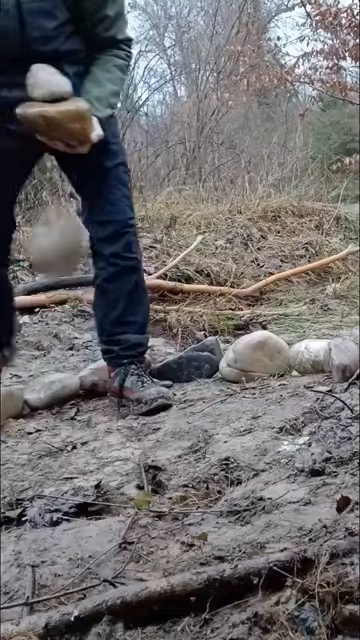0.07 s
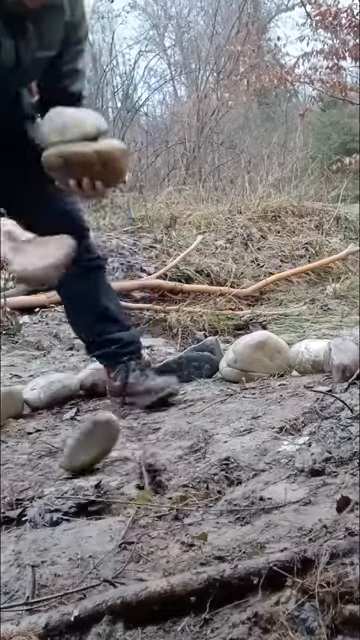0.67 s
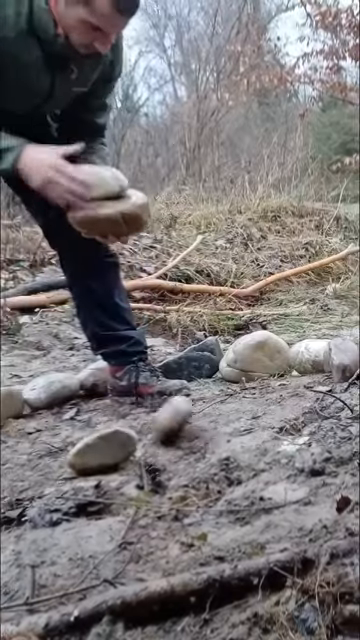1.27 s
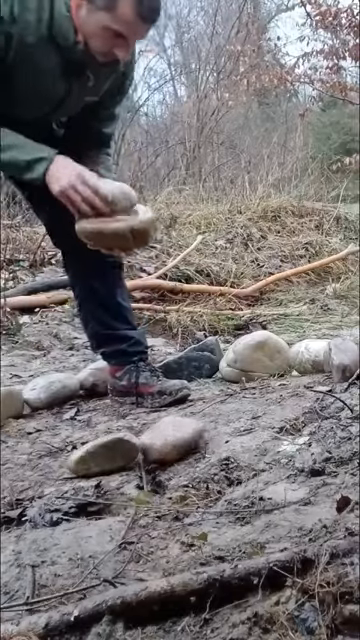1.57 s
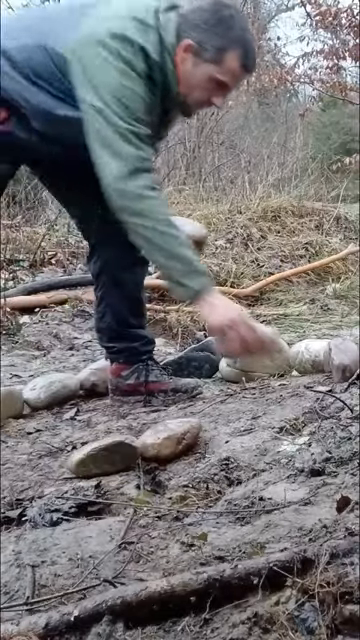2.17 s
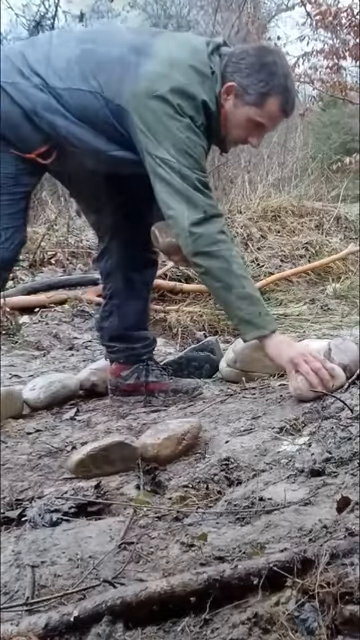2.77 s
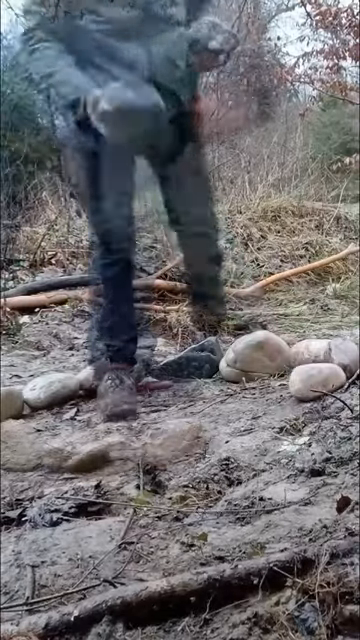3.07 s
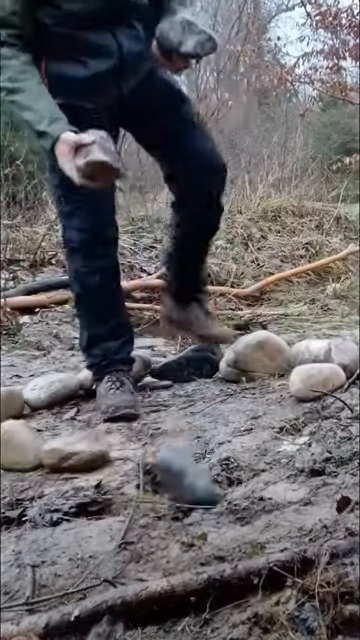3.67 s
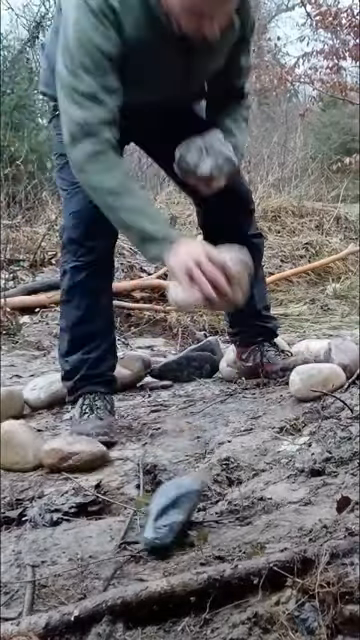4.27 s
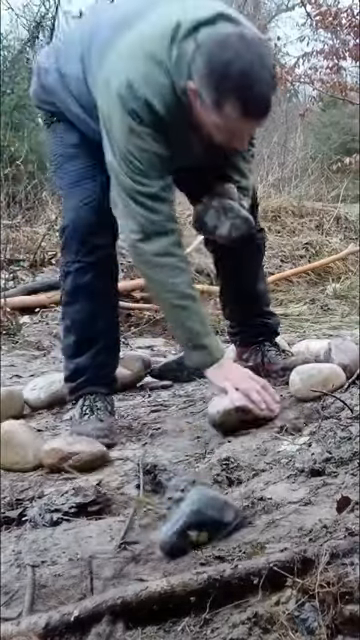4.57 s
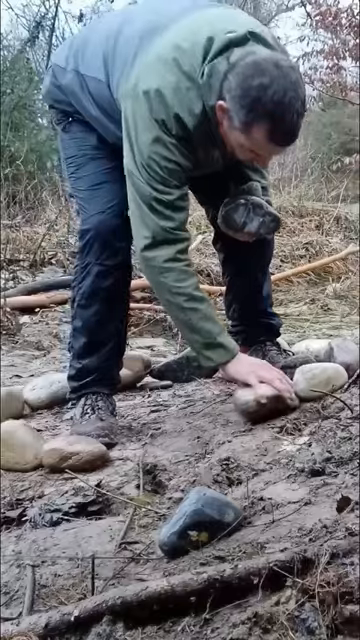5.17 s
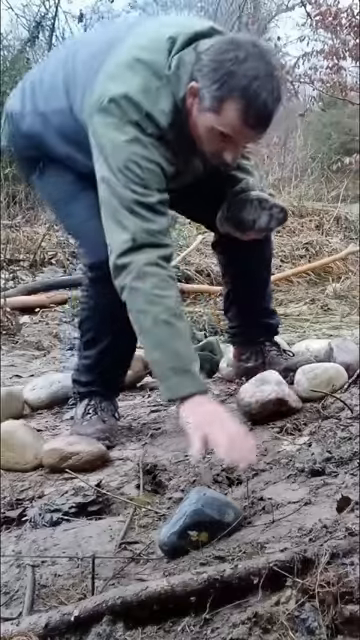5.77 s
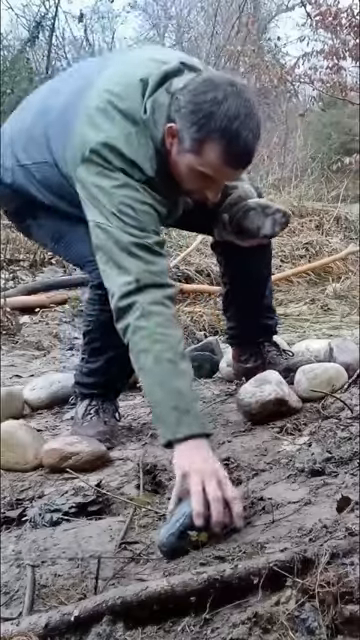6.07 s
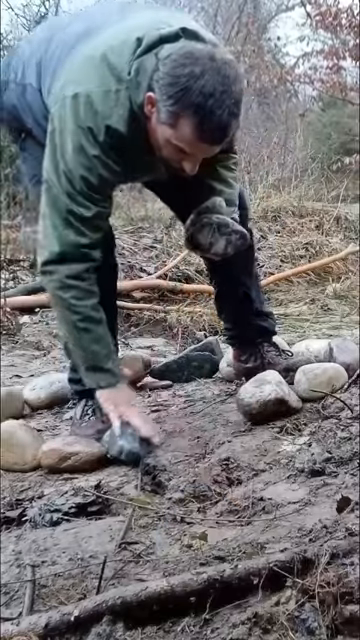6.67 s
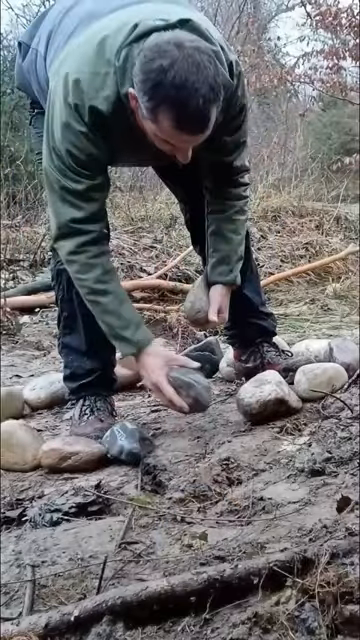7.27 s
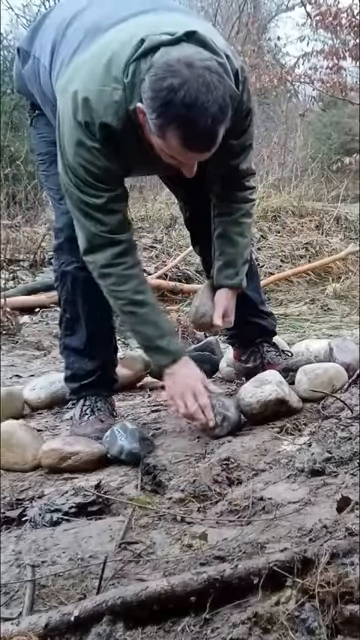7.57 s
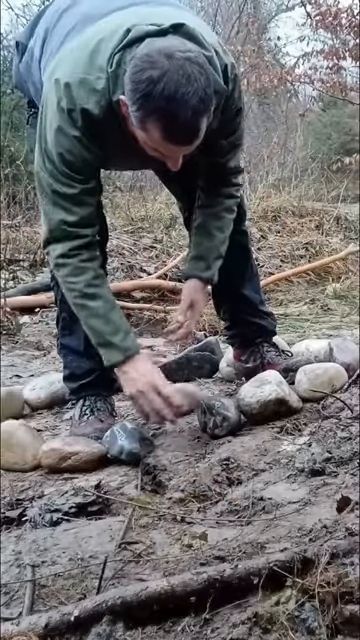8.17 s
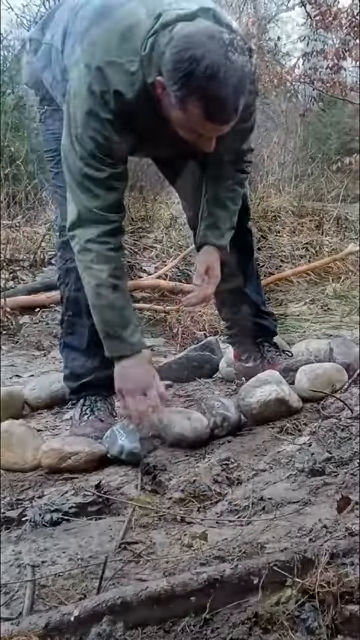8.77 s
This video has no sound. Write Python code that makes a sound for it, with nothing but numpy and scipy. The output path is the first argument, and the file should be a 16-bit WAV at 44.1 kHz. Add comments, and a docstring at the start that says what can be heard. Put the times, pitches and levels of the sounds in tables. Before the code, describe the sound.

Stones thud onto wet mud, then clack sharply against one another outdoors, with faint jacket rustles and a soft wash of drizzle.

```python
"""Rounded stones in a woodland clearing, over a faint wash of drizzle in the trees.
First four stones drop on wet mud, each with a slap and a falling thud through the soil; light
knocks come in between. From 5 s stone strikes stone in dry clacks with quick rebounds, loudest
near 6.8 s and again at 7.7 and 8.5 s. Throughout, a jacket swishes and boots press the ground."""
import sys
import numpy as np
from scipy import signal
from scipy.fft import rfft, irfft
from scipy.io import wavfile
from scipy.ndimage import uniform_filter1d

SR = 44100
rng = np.random.default_rng(int(sys.argv[2]) if len(sys.argv) > 2 else 0)


def generate_wav(signal):
    """Clip the signal to [-1, 1] and save it as 16-bit WAV at the path in sys.argv[1]."""
    frames = np.transpose(np.atleast_2d(signal))
    scaled = np.clip(frames, -1, 1) * 32767
    pcm = np.round(scaled).astype(np.int16)
    wavfile.write(sys.argv[1], SR, pcm)


N = 398223


def stones(bounce_shrink=.92, bounce_pitch=.93, dull_octaves_per_db=.03, rebound_top_hz=4400):
    """Stone on stone: single knocks, and blows with ever quicker, weaker, duller rebounds."""
    # single knocks: start_s, level_db, gap_hz, width_hz, top_hz
    knocks = [ (0.7928, -33, 780, 1200, 3200), (1.5855, -35, 1040, 550, 1700),
              (1.6240, -37.5, 1020, 500, 1870), (1.7470, -43, 1170, 800, 2030),
              (2.8580, -43.5, 600, 1500, 4500), (2.9226, -41.5, 690, 700, 1690),
              (3.011, -46, 1850, 700, 2700), (3.089, -44, 1770, 900, 2600), (3.2090, -40, 1930, 1800, 7000),
              (3.253, -45.5, 1490, 800, 2500), (5.619, -42.5, 700, 700, 1390),
              (6.8102, -7, 1440, 750, 2160), (7.1760, -38, 600, 2200, 5000), (8.4694, -7, 1260, 1160, 2900),
              (8.5041, -18, 827, 596, 1775), (8.573, -35.5, 1100, 900, 2300)]
    # bouncing blows: start_s, level_db, gap_hz, width_hz, top_hz, first_bounce_s, loss_db, rebounds
    rattles = [ (1.547, -26, 1850, 750, 2540, 0.008, 3.8, 4), (5.284, -14, 870, 1110, 2040, .0236, 10, 1),
               (6.8242, 3.5, 1470, 720, 9350, 0.013, 9.5, 3), (7.6703, -8, 1062, 805, 2090, .0194, 7, 1),
               (8.5015, -20, 1370, 1148, 3100, 0.012, 6, 2)]
    out = np.zeros(N)
    for start_s, *blow in knocks:
        add(out, start_s, clack(scatter(), *blow))
    for start_s, level_db, gap_hz, width_hz, top_hz, first_bounce_s, loss_db, rebounds in rattles:
        tail = scatter()  # one spot, same surroundings
        for k in range(round(rebounds) + 1):
            lower = bounce_pitch ** k
            add(out, start_s, clack(tail, level_db - k * loss_db, gap_hz * lower, width_hz * lower, top_hz))
            start_s += first_bounce_s * bounce_shrink ** k
            # weaker blow, longer contact, less treble
            top_hz = min(top_hz, rebound_top_hz) / 2 ** (dull_octaves_per_db * loss_db)
    return out


def clack(tail, level_db, gap_hz, width_hz, top_hz, scatter_db=-6):
    """The jolt of two stones pumps the air gap between them; contact time limits the treble."""
    # hollow ring of the air gap: pitch_ratio, width_hz, gain_db
    gap_modes = [(1, 190, -6), (1.951, 480, -4)]
    # hard surfaces nearby: delay_s, pressure_ratio
    reflections = [(.0014, 0.18), (.0024, 0.097), (.0047, .22), (.0066, 0.14)]
    t = np.arange(len(tail)) / SR
    jolt = cut(signal.unit_impulse(len(t)), top_hz, "low", order=7)
    jolt = cut(jolt, 130, "high", order=1)
    hollow = np.clip(2 - 2 * width_hz / gap_hz, .1, .9)  # flat faces trap air and ring more
    ring = sum(amp(db) * resonate(jolt, ratio * gap_hz, band_hz) for ratio, band_hz, db in gap_modes)
    pulse = resonate(jolt, gap_hz, width_hz) + (.11 + .68 * hollow) * ring
    dip_hz = .56 * gap_hz  # waves from the two stones partly cancel
    pulse -= hollow * resonate(pulse, dip_hz, .42 * dip_hz)
    pulse *= amp(level_db) / abs(pulse).max()
    echoes = sum(share * np.interp(t - delay_s, t, pulse, left=0) for delay_s, share in reflections)
    scattered = amp(scatter_db) * np.std(pulse) * unit(signal.fftconvolve(pulse, tail)[:len(t)])
    return pulse + echoes + scattered + crushed_sand(t, level_db, top_hz)


def crushed_sand(t, blow_db, top_hz, t60_s=.037):
    """Sand caught in the contact crackles; stronger, harder blows crush more."""
    level_db = -50.5 + .62 * blow_db + 10 * np.log2(top_hz / 2200)
    sand = resonate(grains(len(t), spread_db=-9), 7200, 6500)
    sand = cut(sand, 10000, "low", order=6)
    fade = amp(-60 * t / t60_s) + amp(-15.5 - 60 * t / .15)
    return amp(level_db) * unit(sand) * fade


def mud():
    """Falling stones thud and slap; boots and settling stones press the soil with a soft squelch."""
    # stones falling on mud: start_s, thud_db, end_hz, slap_db, spatter_db
    drops = [(.4310, -26, 85, -21.5, -40.5), (1.3837, -31, 76, -35.5, -49),
             (3.552, -25.5, 65.4, -32, -39.5), (4.7604, -35, 59, -40.5, -49.5)]
    # boot steps and settling stones: start_s, thud_db, end_hz
    presses = [ (.954, -55, 78), (1.729, -65, 75), (2.79, -46, 96), (3.203, -60, 81), (4.057, -51, 87),
               (4.366, -60.5, 84.5), (5.298, -56, 90), (5.623, -66, 68), (6.81, -34, 101.4),
               (7.649, -43, 84), (8.47, -45, 78), (8.533, -40.5, 90)]
    out = np.zeros(N)
    for start_s, thud_db, end_hz, slap_db, spatter_db in drops:
        add(out, start_s, thud(thud_db, start_hz=330, end_hz=end_hz, sink_s=.037))
        top_hz = 500 * (1 + amp(slap_db + 23))  # louder is brighter
        add(out, start_s, slap(slap_db, top_hz, spatter_db))
    for start_s, thud_db, end_hz in presses:
        add(out, start_s, thud(thud_db, start_hz=1.9 * end_hz, end_hz=end_hz, sink_s=.04))
        add(out, start_s, slap(slap_db=-58.5, top_hz=500, spatter_db=-61))
    return out


def thud(thud_db, start_hz, end_hz, sink_s, glide_s=.0095, rumble_t60_s=.36):
    """Soil yields unevenly under the weight: a few falling cycles, then a lumpy settling rumble."""
    t = np.arange(SR // 2) / SR
    lumps = noise([(20, 0), (150, 0), (300, -25), (1000, -80)], len(t))
    pitch_hz = (end_hz + (start_hz - end_hz) * np.exp(-t / glide_s)) * (1 + .2 * lumps)
    bump = .89 * np.exp(-t / .0086)
    sinking = 2.02 * (t / sink_s) * np.exp(-(t / (.72 * sink_s)) ** 2.6)
    push = np.sin(2 * np.pi * np.cumsum(pitch_hz) / SR) * (bump + sinking)
    jolts = amp(2.5 * noise([(5, 0), (30, 0), (70, -30), (300, -90)], len(t)))
    # ringing of the soil: frequency_hz, density_db
    soil = [(20, -55), (45, -8.5), (70, 4), (120, -4.5), (170, -10), (270, -10), (380, -19.5), (700, -38.5),
            (2000, -58.5)]
    settling = (1 - np.exp(-(t / .039) ** 2)) * amp(-60 * t / rumble_t60_s)
    rumble = noise(soil, len(t)) * unit(jolts) * settling
    rumble_db = -18 + .63 * thud_db
    return amp(thud_db) * push + amp(rumble_db) * rumble


def slap(slap_db, top_hz, spatter_db, slap_t60_s=.052, spatter_t60_s=.041, plop_hz=450):
    """Air squeezed from under the weight plops, and wet soil spatters."""
    t = np.arange(SR // 4) / SR
    blow = signal.unit_impulse(len(t)) + .062 * rng.standard_normal(len(t)) * amp(-60 * t / slap_t60_s)
    puff = cut(blow, top_hz, "low", order=2)
    puff = cut(puff, 260, "high", order=2)
    puff += amp(1) * resonate(puff, plop_hz, 220)
    spatter = cut(grains(len(t), spread_db=3.5), 910, "high", order=1)
    spatter = cut(spatter, 10000, "low", order=3)
    spatter = unit(spatter + 2.3 * cut(spatter, 2994, "low", order=1))
    fade = amp(-60 * t / spatter_t60_s) + amp(-17.5 - 60 * t / .27)
    return amp(slap_db) * puff / abs(puff).max() + amp(spatter_db) * spatter * fade


def handling():
    """Cloth swishes, grit snaps and a stone scrapes in the hands."""
    # cloth brushing or a stone sliding: peak_s, rise_s, level_db, centre_hz
    strokes = [ (1.71, 0.022, -65, 7000), (2.33, .13, -65, 2400), (2.785, .035, -62.5, 6000),
               (3.18, 0.038, -73, 12500), (3.84, 0.077, -63, 6900), (4.035, 0.053, -58.5, 11000),
               (4.23, 0.067, -60, 8100), (4.38, .14, -64, 1800), (4.788, 0.02, -51, 7350),
               (5.326, 0.033, -62.5, 9400), (6.17, .07, -65.5, 10200), (6.368, .036, -53, 8550),
               (6.42, 0.029, -52, 9000), (6.465, 0.014, -50.5, 8500), (7.23, .09, -67.5, 7500),
               (7.695, 0.022, -66.5, 9500), (8.135, 0.031, -58.5, 10380), (8.5, 0.037, -56, 8480)]
    # grit snapping: peak_s, level_db, centre_hz
    ticks = [(.793, -58, 7500), (.902, -60, 2800), (2.334, -59, 3480), (2.566, -61, 7000),
             (3.195, -56.5, 12000), (3.829, -47.5, 8000), (4.0568, -40, 12500), (5.765, -59, 7860)]
    # stone passed between hands: peak_s, fall_s, level_db
    handover = (7, .11, -60)
    out = np.zeros(N)
    for peak_s, rise_s, level_db, centre_hz in strokes:
        add(out, *swish(peak_s, level_db, centre_hz, rise_s, fall_s=1.2 * rise_s))
    for peak_s, level_db, centre_hz in ticks:
        add(out, *swish(peak_s, level_db, centre_hz, rise_s=.0009, fall_s=.0058))
    add(out, *scrape(*handover))
    return out


def swish(peak_s, level_db, centre_hz, rise_s, fall_s, catch_db=1.9, snap_db=-9, body_db=-2):
    """Fibres or grit catch and slip between sliding surfaces. Returns start_s, sound."""
    t = np.arange(-2.5 * rise_s, 4 * fall_s, 1 / SR)
    stroke = np.where(t < 0, np.exp(-(t / rise_s) ** 2), np.exp(-abs(t / fall_s) ** 1.2))
    catches = amp(catch_db * unit(uniform_filter1d(rng.standard_normal(len(t)), size=200)))
    snaps_per_s = centre_hz / 20  # coarser surface: lower sound, fewer snaps
    snaps = unit(rng.standard_normal(len(t)) * (rng.random(len(t)) < snaps_per_s / SR))
    rub = resonate(grains(len(t), spread_db=0) + amp(snap_db) * snaps, centre_hz, .45 * centre_hz)
    body = resonate(rng.standard_normal(len(t)), 2200, 2150)
    return peak_s + t[0], amp(level_db) * stroke * unit((rub + amp(body_db) * body) * catches)


def scrape(peak_s, fall_s, level_db, rise_s=.025):
    """Grit rubbed over a stone excites narrow resonances. Returns start_s, sound."""
    # resonances of the rubbed stone: pitch_hz, width_hz, gain_db
    modes = [(820, 150, 3), (1624, 130, -3), (2560, 80, 0.5)]
    t = np.arange(-2.5 * rise_s, 4 * fall_s, 1 / SR)
    rub = grains(len(t), spread_db=2)
    ring = sum(amp(db) * unit(resonate(rub, hz, width_hz)) for hz, width_hz, db in modes)
    stroke = np.where(t < 0, np.exp(-(t / rise_s) ** 2), np.exp(-t / fall_s))
    return peak_s + t[0], amp(level_db) * unit(ring) * stroke


def scatter(near_t60_s=.044, far_t60_s=.14, far_db=-18):
    """Rough ground, legs and other stones scatter a pulse into a short tail."""
    t = np.arange(SR // 5) / SR
    fade = amp(-60 * t / near_t60_s) + amp(far_db - 60 * t / far_t60_s)
    return fade * (1 - np.exp(-t / .0018)) * rng.standard_normal(len(t))


def woods(x, near_db=-38, near_t60_s=.53, far_db=-45, far_t60_s=.78, edge_s=.16):
    """Nearby brush gives a faint tail; trunks at the clearing's edge answer later."""
    # dull echo off the trees: frequency_hz, density_db
    trees = [(100, -4), (500, -9), (800, 0), (1200, -7.5), (2600, 2.5), (3500, -10.5), (12000, -25)]
    t = np.arange(SR) / SR
    brush = noise(trees, len(t)) * amp(-60 * t / near_t60_s)
    trunks = noise(trees, len(t)) * amp(-60 * t / far_t60_s) / (1 + np.exp(-(t - edge_s) / .0046))
    tail = amp(near_db) * brush / np.linalg.norm(brush) + amp(far_db) * trunks / np.linalg.norm(trunks)
    return signal.fftconvolve(x, tail)[:N]


def drizzle(wash_db=-63.5, swell_db=.08, patter_db=-82, drops_per_s=150):
    """An even wash from far off, with a fine patter on the leaves."""
    # distant drizzle and trees: frequency_hz, density_db
    wash = [(15, -75), (25, -49), (62, -15), (164, 1), (227, -3.5), (359, -5.5), (537, -5.5), (782, -2.5),
            (945, -1.5), (1170, -2.5), (1450, -4), (2850, -7), (4040, -15), (9550, -15.5), (15500, -31)]
    # left-right likeness of the wash: frequency_hz, coherence
    likeness = [(60, 1.0), (240, 0.99), (950, 1), (3770, 1), (15000, 0.6)]
    coherence = np.clip(read(likeness, np.fft.rfftfreq(N, 1 / SR)), 0, 1)
    mid = noise(wash, N)
    side = irfft(rfft(noise(wash, N)) * np.sqrt((1 - coherence) / (1 + coherence)), N)
    swell = noise([(0, -20), (.4, 0), (1.5, 0), (6, -40), (30, -120)], N)
    drops = rng.standard_normal(N) * (rng.random(N) < drops_per_s / SR)
    patter = amp(patter_db) * unit(resonate(drops, 3000, 4300))
    return amp(wash_db + swell_db * swell) * np.array([mid + side, mid - side]) + patter


def amp(db):
    """Decibels to gain."""
    return 10 ** (np.asarray(db) / 20)


def unit(x):
    """Scales to rms 1."""
    return x / np.sqrt(np.mean(x ** 2) + 1e-20)


def read(points, hz):
    """Interpolates (frequency_hz, value) points on a log-frequency axis."""
    points_hz, values = np.transpose(points)
    return np.interp(np.log(hz + 1), np.log(points_hz + 1), values)


def add(mix, start_s, sound):
    """Mixes a sound in at start_s."""
    part = mix[max(round(start_s * SR), 0):][:len(sound)]
    part += sound[:len(part)]


def cut(x, hz, kind, order):
    """Causal low-pass or high-pass."""
    return signal.sosfilt(signal.butter(order, min(hz, .49 * SR), kind, fs=SR, output="sos"), x)


def resonate(x, hz, width_hz):
    """One resonance, peak gain 1."""
    return signal.lfilter(*signal.iirpeak(hz, hz / width_hz, fs=SR), x)


def noise(spectrum, size):
    """Noise of rms 1 shaped by (frequency_hz, density_db) points."""
    gain = amp(read(spectrum, np.fft.rfftfreq(size, 1 / SR)))
    return unit(irfft(rfft(rng.standard_normal(size)) * gain, size))


def grains(size, spread_db):
    """Dense crackle of tiny, uneven clicks."""
    return unit(rng.standard_normal(size) * amp(spread_db * np.minimum(rng.exponential(1, size), 4)))


def scene(side_db=-35):
    """Stones, mud and cloth straight ahead; scatter from the sides, woods and drizzle behind."""
    near = stones() + mud() + handling()
    around = scatter()
    side = amp(side_db) * signal.fftconvolve(near, around / np.linalg.norm(around))[:N]
    return near + woods(near) + np.array([side, -side]) + drizzle()


def record(dry, start_s=.163, fade_s=.005, low_hz=42, top_hz=15700):
    """Brief silence and fade-in, bass cut, peak clipping, treble limit."""
    fade_in = np.clip((np.arange(N) / SR - start_s) / fade_s, 0, 1)
    clipped = np.clip(cut(dry * fade_in, low_hz, "high", order=4), -.9, .9)
    low_pass = signal.firwin(511, top_hz, window=("kaiser", 9), fs=SR)
    return signal.oaconvolve(clipped, low_pass[None], "same")


dry = scene()
out = record(dry)
generate_wav(out)
```